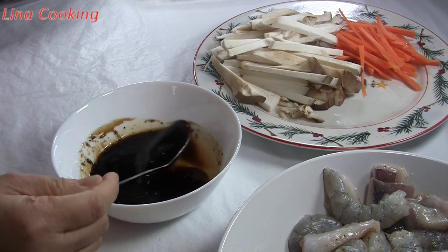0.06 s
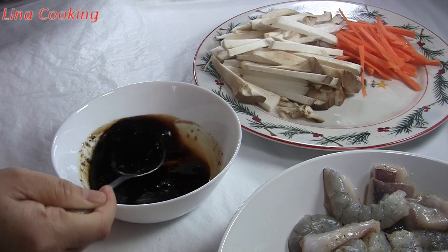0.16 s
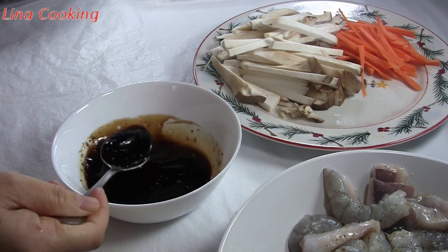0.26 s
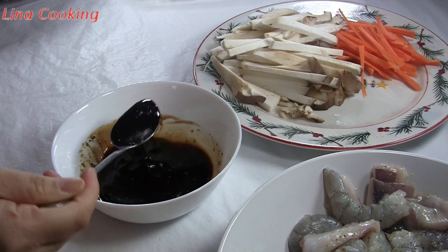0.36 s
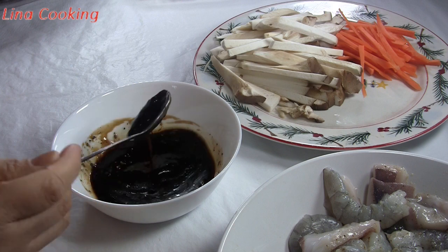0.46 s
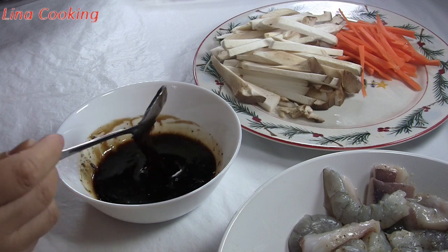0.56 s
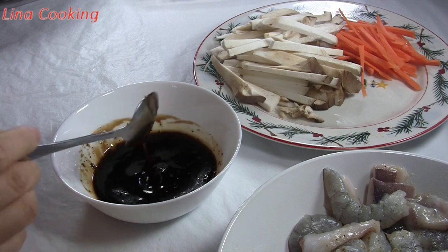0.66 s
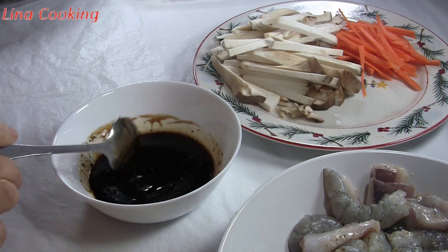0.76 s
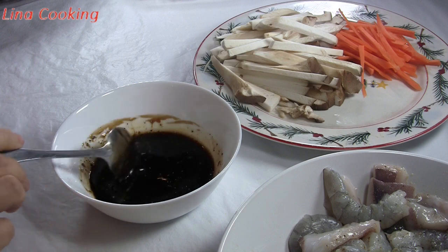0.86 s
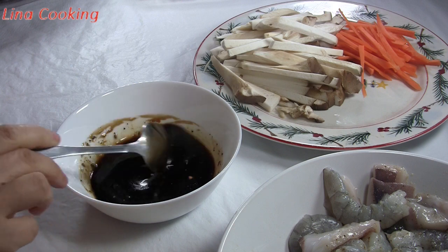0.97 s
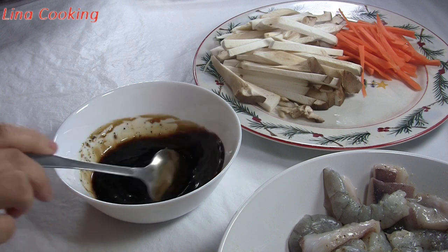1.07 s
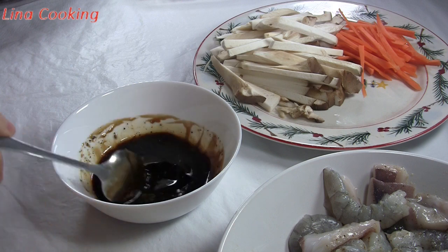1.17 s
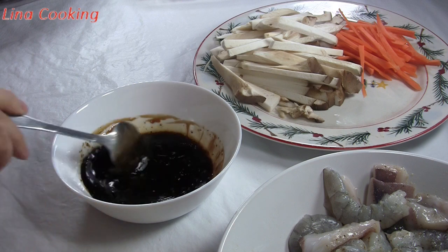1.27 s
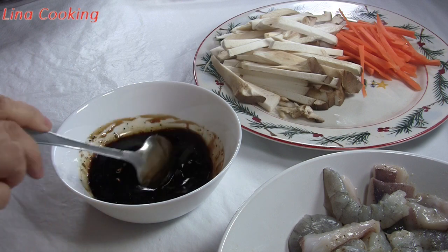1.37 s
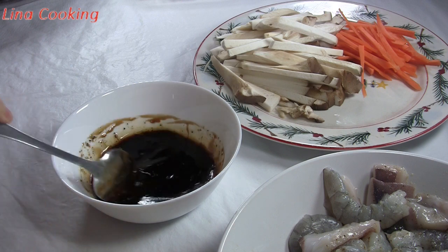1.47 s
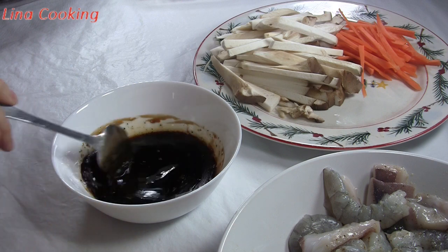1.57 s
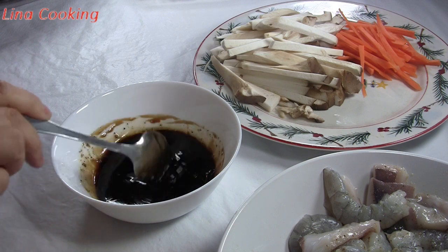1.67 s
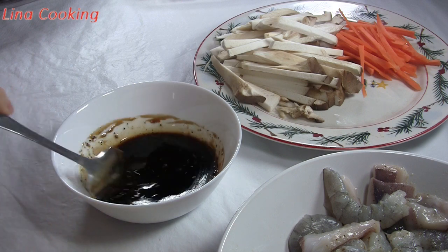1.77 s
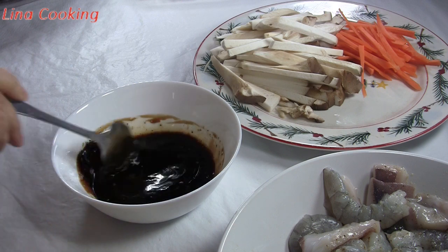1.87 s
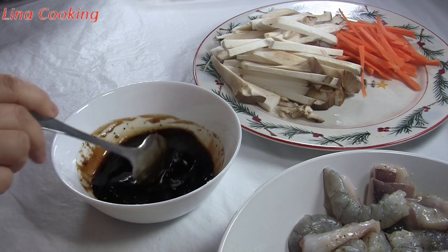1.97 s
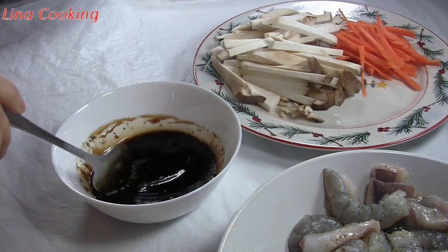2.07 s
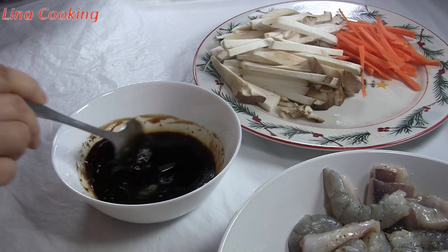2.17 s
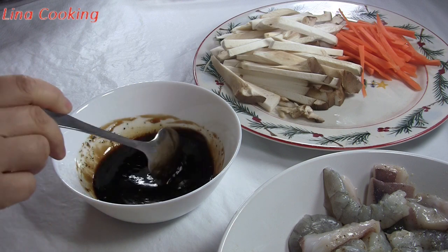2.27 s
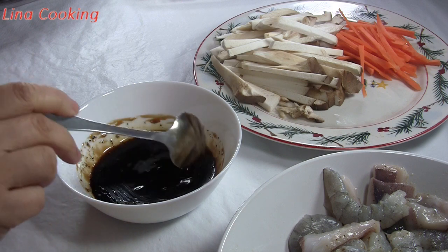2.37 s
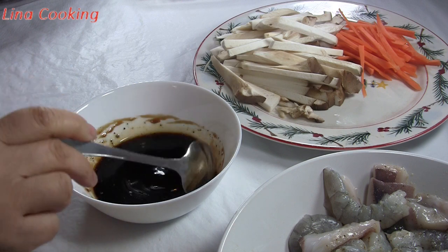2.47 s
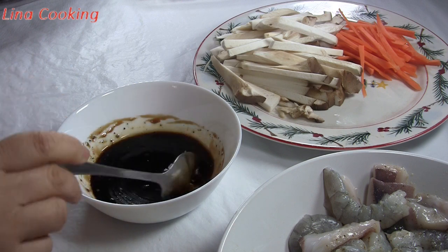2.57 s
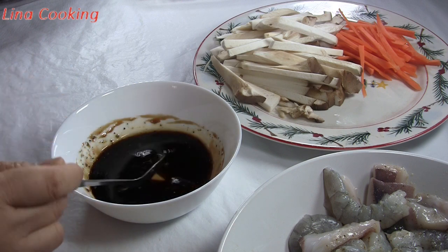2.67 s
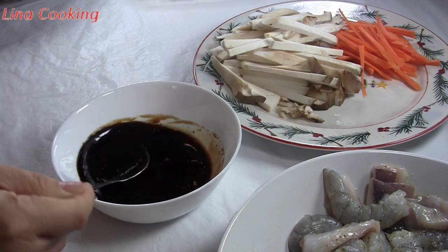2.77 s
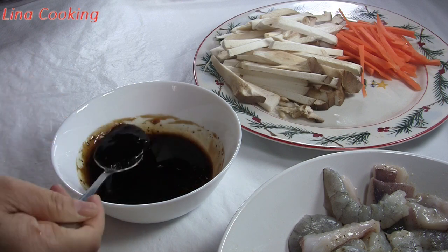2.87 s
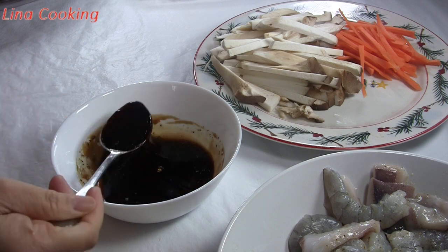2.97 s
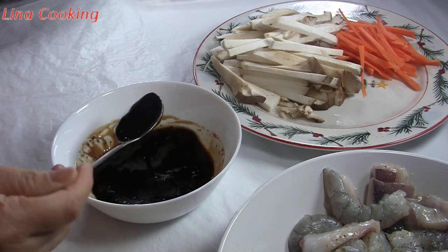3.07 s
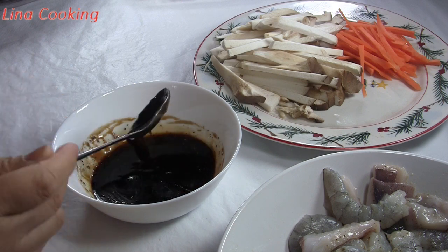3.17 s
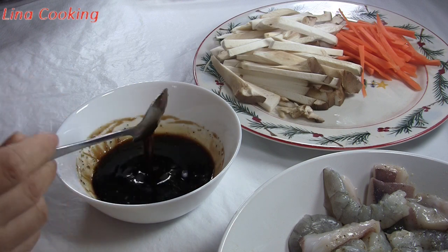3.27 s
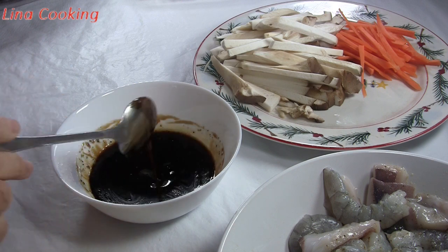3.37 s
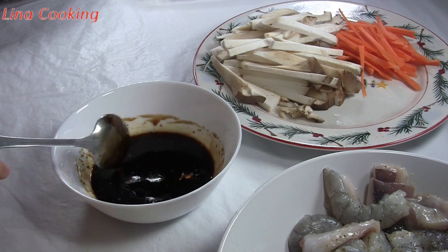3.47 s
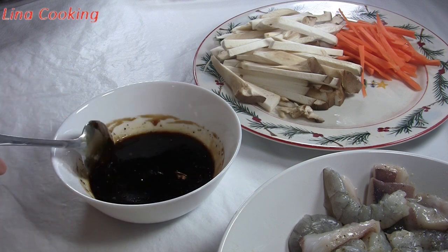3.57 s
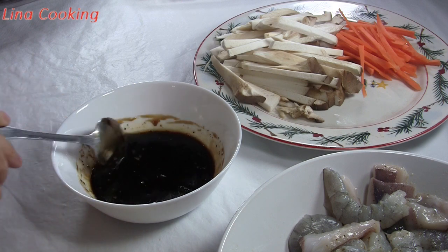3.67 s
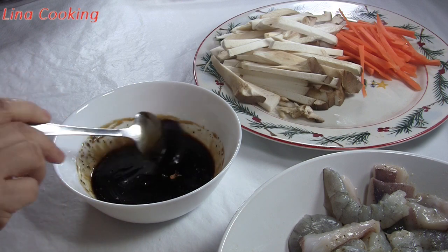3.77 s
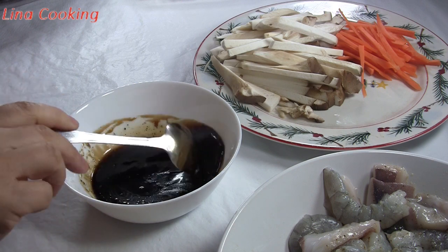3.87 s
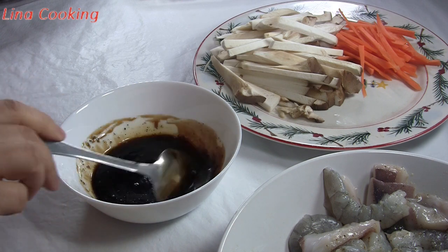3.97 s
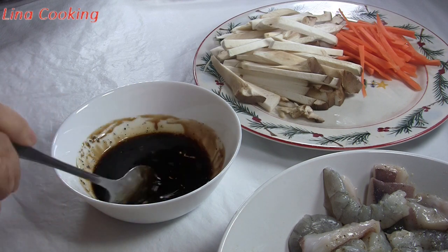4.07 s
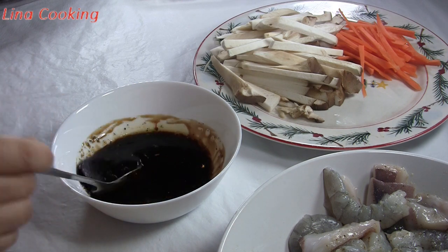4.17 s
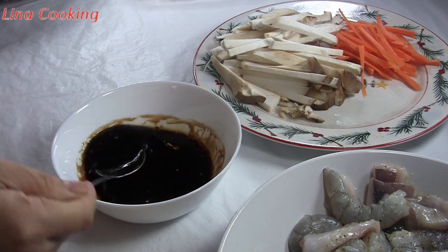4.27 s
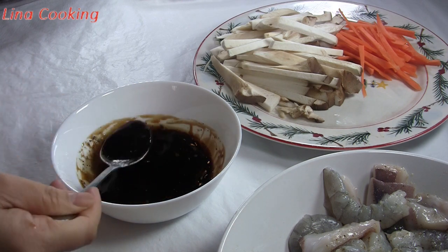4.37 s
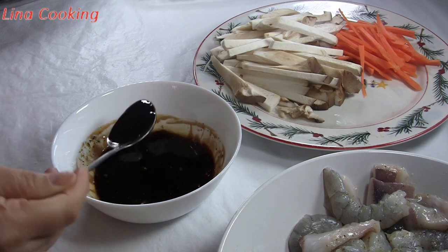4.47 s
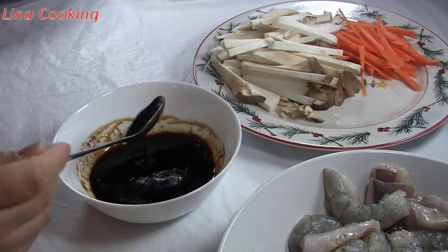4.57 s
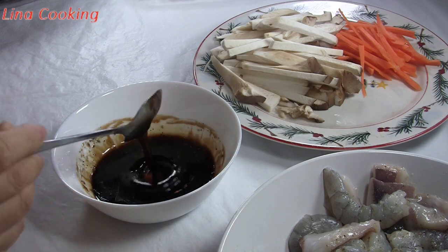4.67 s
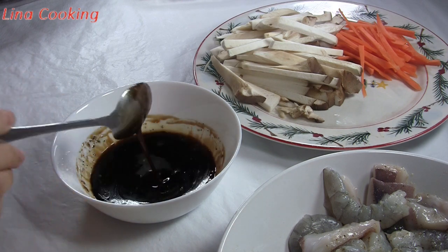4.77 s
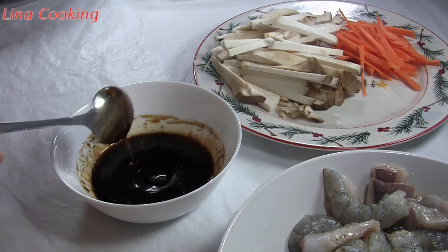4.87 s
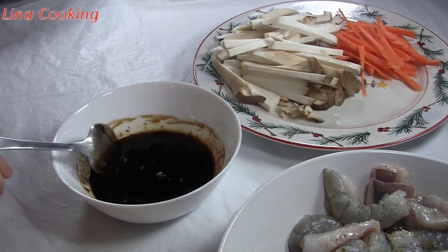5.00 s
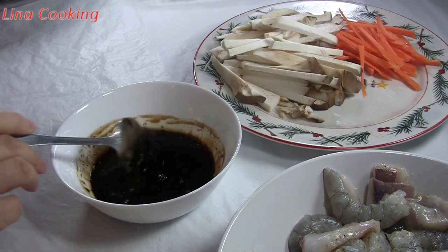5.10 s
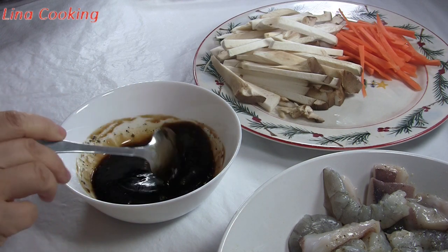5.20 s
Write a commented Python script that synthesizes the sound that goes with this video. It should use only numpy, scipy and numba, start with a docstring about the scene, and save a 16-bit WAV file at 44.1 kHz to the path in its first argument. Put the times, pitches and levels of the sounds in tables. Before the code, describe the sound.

Close, irregular stirring: sharp spoon clinks, short ceramic rings, damped ticks and soft glaze scraping, with faint drips over low kitchen noise.

```python
"""A metal spoon stirs thick sauce in a ceramic bowl on a cloth, close to a pair of microphones.
Throughout: kitchen air noise and a wavering hum, both from shaped noise. From the start, knocks crack
(noise bursts), ring the bowl (fixed modes) and set off the spoon (damped modes whose pitch slides).
Between knocks the spoon's edge chatters along the glaze: stick-slip impulses and grit hiss.
From 0.6 s a few drips chirp upward. Dishes and room echo spoon, bowl and drips."""
import sys
import numpy as np
from scipy import signal
from scipy.fft import rfft, irfft, next_fast_len
from scipy.io import wavfile
from numba import njit

SR = 44100
rng = np.random.default_rng(int(sys.argv[2]) if len(sys.argv) > 2 else 0)


def wrap_up_sound(samples):
    """Save the sound to the file named by the first command line argument, as 16-bit audio."""
    columns = np.atleast_2d(samples).T
    # keep every value between -1 and 1, then stretch to whole-number steps
    tamed = np.clip(columns, -1, 1)
    steps = np.round(tamed * 32767).astype(np.int16)
    wavfile.write(sys.argv[1], SR, steps)


N = 231012

# kitchen noise spectra, mid and side: (frequency [Hz], density [dB per Hz])
KITCHEN_MID_SPECTRUM = [(12, -59.5), (20, -72), (49, -4), (96, -6), (189, -3.5), (223, -6), (257, 2.5),
                        (287, -4), (476, -8.5), (517, -8.5), (833, -16), (1730, -22.5), (2560, -23.5),
                        (15000, -34), (16300, -56)]
KITCHEN_SIDE_SPECTRUM = [(12, -45), (20, -9), (295, -2.5), (547, -10), (907, -12.5), (1130, -16),
                         (1730, -16), (2290, -20), (2630, -20), (15000, -30.5), (16300, -34)]
KITCHEN_MID_DB, KITCHEN_SIDE_DB, KITCHEN_LEFT_MINUS_RIGHT_DB = -51., -54.5, -2
HUM_HZ, HUM_WIDTH_HZ, HUM_DB = 256, 14, -63.5

# hard knocks on the wall: (time [s], crack [dB], thud [dB], damped spoon [dB], edge-on [0-1],
# crack t60 [s], low bowl ring [dB], high bowl ring [dB])
KNOCKS = [(.0064, -17, -45, -22.5, 0.83, 0.025, -36, -45),
          (0.0291, -30.5, -31.5, -26, 0.98, 0.077, -82, -60),
          (0.1696, -24, -27.5, -34, 0.28, 0.029, -36, -41.5),
          (0.9305, -10, -19.5, -41, 0.09, 0.013, -42, -51), (1.9248, -26, -23, -59, 0.11, 0.02, -44.5, -66),
          (2.2232, -28.5, -29, -56, 0.09, 0.038, -40, -58),
          (2.2663, -31.5, -29.5, -27, .02, 0.032, -56, -64),
          (2.5787, -25, -59, -54, 0.09, 0.07, -36.5, -46), (2.9226, -27, -40.5, -30, 1, 0.065, -58, -56),
          (3.699, -22, -22.5, -16.5, 0.14, 0.037, -43.5, -45),
          (3.8938, -25, -17, -15, 0.08, 0.062, -44, -68), (4.1201, -19, -22.5, -35, 0.06, .11, -33, -23),
          (4.133, -21.5, -29, -16, 0, 0.016, -69, -32), (5.1296, -12, -15, -33, 0.07, 0.019, -42, -69)]
# light ticks, no bowl ring: (time [s], crack [dB], thud [dB], damped spoon [dB], place on rim [turns])
TICKS = [(.0214, -40, -29, -45, 0.26), (.0502, -31, -53, -26, 0.075), (.0915, -28.5, -50, -22.5, 0.23),
         (.1084, -32, -48, -40, .2), (.1844, -47, -62, -41, .33), (.6963, -40.5, -77, -52, 0.017),
         (.944, -41, -60, -9.5, 0.77), (1.032, -53, -65, -41, 0.76), (1.0929, -44, -24, -11, 0.027),
         (1.1948, -59, -54, -32, 0.15), (1.2704, -50, -61, -33, 0.28), (1.4098, -39, -72, -33, 0.37),
         (1.4696, -41, -66, -28.5, 0.35), (1.512, -37, -58, -22.5, 0.43), (1.5499, -38.5, -57, -34, 0.49),
         (1.694, -40, -40, -38, .1), (1.7382, -40, -55, -29, 0.88), (1.8083, -58, -52, -21, 0.39),
         (1.838, -39, -42, -29, 0.43), (1.9377, -51, -36, -32, 0.77), (2.0384, -40.5, -63, -35, 0.41),
         (2.0916, -43, -64, -27.5, 0.05), (2.1056, -55, -64, -19, 0.49), (2.1307, -53, -66, -28.5, .38),
         (2.2354, -52, -31, -40, 0.14), (2.6256, -37, -34, -49, 0.37), (2.7026, -40, -38, -31, 0.085),
         (2.741, -29, -65, -22, 0.39), (2.7754, -36, -63, -27, 0.43), (2.8156, -41, -41.5, -52, 0.26),
         (2.8627, -39, -40.5, -40, .55), (3.715, -51, -31, -23, 0.2), (4.1503, -48, -46, -22, 0.73),
         (4.1798, -31.5, -30, -28, 0.22), (4.2094, -34, -33.5, -32, 0.44), (5.1441, -51, -54, -37, 0.63)]
TICK_T60_S = 0.016
# contact noise spectra: (frequency [Hz], density [dB per Hz])
CRACK_SPECTRUM = [(180, -60), (300, -2), (1580, -6.5), (4590, 4), (5080, -0.5), (6850, 0), (11700, 0),
                  (15200, -6.5), (16000, -57)]
THUD_SPECTRUM = [(150, -48.5), (450, -8), (950, -6), (1600, 3), (2300, -5.5), (3600, -5.5), (8000, -54)]

# bowl mode pitches: (frequency [Hz])
BOWL_HZ = [774, 1233, 1752, 2955, 3009, 4538, 5040, 6336, 8441, 9593, 10760, 11390, 12470, 13300, 13420,
           14990]
# bowl modes, same order: (level [dB], t60 [s])
BOWL_MODES = [(-11, 0.81), (-15, 0.16), (-6.5, 1.01), (-5, 0.17), (-1, 0.54), (0, 0.4), (-11, 0.17),
              (-4.5, 0.26), (-13, .27), (-17, 0.16), (-6, 0.1), (-15, .2), (-32, .3), (-8, .14), (-20, .18),
              (-21, .15)]
# modes of the spoon free of the sauce: (frequency [Hz])
FREE_SPOON_HZ = [2893, 4930, 7790, 7990, 10430, 12140, 13495]
# same order: (level [dB], t60 [s])
FREE_SPOON_MODES = [(0, 0.33), (-9, 0.094), (-5, 0.27), (3.5, 0.05), (-17, 0.3), (-20, 0.11), (2, 0.097)]
# modes of the spoon struck on its edge: (frequency [Hz])
EDGE_HZ = [4021, 6358]
# same order: (level [dB], t60 [s])
EDGE_MODES = [(-7.5, 0.077), (-6.5, 0.065)]
FREE_RING_DB = -20.5  # re crack
# re crack: (flat knock [dB], edge-on knock [dB])
UPPER_DB, EDGE_RING_DB = (7, -48), (-59, 6)

# strokes along the glaze, rise and fall span 20 dB: (time [s], rise [s], hold [s], fall [s],
# body [dB], upper [dB], depth in sauce [0-1], middle resonance [Hz], upper resonance [Hz])
STROKES = [(0.007, 0.016, 0.21, 0.02, -38, -52.5, 0.6, 2910, 5030),
           (0.09, .015, 0.0034, 0.058, -34, -37, 1, 2940, 5200),
           (0.172, 0.027, 0.009, 0.05, -34.5, -44, 0.13, 2976, 4760),
           (0.969, 0.025, 0.13, 0.025, -42, -34, 0.26, 2842, 4934),
           (1.102, 0.04, .002, 0.11, -36.5, -37, 0.35, 3106, 4770),
           (1.161, .05, 0.091, .04, -44.5, -48.5, 0.73, 3020, 5030),
           (1.278, 0.024, 0.0023, 0.12, -33.5, -52, .4, 3020, 4800),
           (1.363, 0.13, 0.89, .05, -56, -59, 0.31, 3040, 5350),
           (1.47, 0.14, 0.064, 0.13, -43, -62, 1, 3080, 4900),
           (1.708, 0.021, .002, 0.2, -39, -58, 0.63, 3056, 5380),
           (1.79, 0.051, 0.06, 0.064, -42.5, -57.5, 0.86, 3270, 4970),
           (1.953, 0.021, 0.0017, 0.2, -52, -48, 0.1, 3000, 5230),
           (2.087, 0.045, 0.038, 0.098, -40.5, -52.5, 1, 3140, 4950),
           (2.286, .02, .005, 0.062, -39.5, -41.5, 0.38, 2933, 5090),
           (2.595, 0.026, 0.079, 0.08, -48.5, -52, 0.47, 2850, 4760),
           (2.735, 0.13, 0.041, 0.063, -38, -50, 1, 3045, 5470),
           (2.858, 0.04, 0.0022, 0.047, -43, -47, 0.05, 3005, 5130),
           (2.936, 0.04, .02, 0.1, -39.5, -60, 0.5, 3020, 5050),
           (3.724, 0.01, .002, 0.057, -28.5, -55, 0.74, 2884, 5000),
           (3.915, 0.015, .002, 0.071, -27, -40, 0.36, 2924, 5370),
           (3.983, .02, 0.094, 0.028, -60, -63, 0, 2950, 5230),
           (4.165, 0.017, 0.022, 0.044, -30.5, -34, 0, 2967, 4850),
           (4.243, .02, 0.028, 0.13, -47, -48.5, .4, 3080, 5010),
           (5.155, 0.011, 0.1, .03, -52, -35, 0.4, 2860, 4990)]
# lower, middle, side resonance re body: (bare glaze [dB], deep in sauce [dB])
BODY_MIX = [(-18, -3.5), (2, -19), (-42.5, -5.5)]
# lower resonance as the spoon dips and tilts: (time [s], frequency [Hz], gain [dB])
DIP = [(0, 1470, 0.5), (.12, 1140, -1.5), (1.102, 1400, -2), (1.125, 2600, -8), (1.16, 2420, -6),
       (1.24, 2004, 2), (1.31, 1590, -2.5), (1.37, 1650, -6), (1.4, 2410, -24), (1.471, 2020, 4.5),
       (1.53, 1770, -4), (1.7, 1950, -2), (1.82, 1777, -6.5), (2.13, 1695, -14), (2.3, 1640, 1),
       (2.75, 1170, -17), (2.86, 1210, 2), (2.95, 1630, -6), (3.701, 1845, -4), (4.098, 1840, -4.5),
       (4.131, 1360, -4.5), (4.3, 1190, -1), (5.13, 2010, -3)]
# lower, middle, side, upper resonance, damped by hand and sauce: (t60 [s])
SPOON_T60_S = [.026, .07, .018, .032]
# modes clustered at each of the four: (pitch ratio [1], level [dB])
CLUSTERS = [
    [(1, 0)],
    [(1, 0)],
    [(1, 0), (.96, -3), (1.05, -3)],
    [(1, 0), (.96, -3), (1.03, -5), (1.09, -13)],
]
SIDE_HZ, SIDE_WANDER_SHARE, SIDE_WANDER_STEP_S = 3570., .022, .04
TICK_LOWER_DB = -4  # lower resonance's share of a tick, re side
RIM_SPREAD_DB = 11  # loss a quarter turn from a resonance's best place
# sauce grit spectrum: (frequency [Hz], density [dB per Hz])
GRIT_SPECTRUM = [(290, -57), (500, -45), (1210, -14), (2500, -16), (3700, -27), (4150, -49), (4870, 14.5),
                 (5970, -2), (10700, -0.5), (16000, -6)]
GRIT_DB, GRIT_GROWTH_DB_PER_DB = -54.5, 0.68  # hiss under a -50 dB stroke; growth with stroke level

# drips of sauce falling back: (time [s], level [dB], starting pitch [Hz])
DRIPS = [(0.634, -45, 190), (2.93, -39.5, 246), (3.35, -33, 5050), (3.375, -41, 4700), (3.841, -44, 1060),
         (4.285, -41, 3360), (4.815, -47, 1380)]

# microphone ports: (frequency [Hz], left minus right [dB])
PORT_BALANCE = [(100, -15), (700, -3), (1400, -1), (2800, -6.5), (5600, -2), (12000, -2)]
# (frequency [Hz], phase by which left leads [rad])
PORT_PHASE = [(0, 0), (600, .2), (1900, .6), (2600, 1.2), (4500, 1.9), (8000, 1.5), (12000, 1.6),
              (16000, 2.4)]
SCATTER_T60_S, SCATTER_DB, SCATTER_TOP_HZ = 0.012, -5, 13000.
ROOM_T60_S, ROOM_DB, ROOM_TOP_HZ = 0.52, -15, 6340
TOP_HZ, CLIP_LEVEL = 16200, .96


def undb(db):
    """Decibels to gain."""
    return 10 ** (np.asarray(db) / 20)


def level(x, rms_db):
    """Scale to an rms level."""
    return x * undb(rms_db) / np.sqrt(np.mean(x ** 2))


def between(ends, share):
    """Blend two values by a share of 0 to 1."""
    return ends[0] + np.clip(share, 0, 1) * (ends[1] - ends[0])


def over_bins(table, size):
    """Read a (Hz, value) table at every transform bin, linear over log frequency."""
    hz, value = np.transpose(table)
    bin_hz = np.fft.rfftfreq(size, 1 / SR)
    return np.interp(np.log(bin_hz + 1), np.log(hz + 1), value)


def colour(x, spectrum):
    """Filter a sound by a spectrum in dB."""
    return irfft(rfft(x) * undb(over_bins(spectrum, len(x))), len(x))


def keep_of(t60_s):
    """Share of a swing left after one sample."""
    return 1000. ** (-1 / (max(t60_s, .002) * SR))


@njit
def ring(x, hz, keep):
    """One driven mode: a decaying rotating phasor whose pitch may slide per sample."""
    y, z = np.empty(len(x)), 0j
    for i in range(len(x)):
        z = z * keep * np.exp(2j * np.pi * hz[i] / SR) + x[i] + 1e-18
        y[i] = z.imag
    return y


def train(times_s, gains):
    """Impulses at the given times."""
    x = np.zeros(N)
    at = np.clip((times_s * SR).astype(int), 0, N - 1)
    np.add.at(x, at, gains)
    return x


def kitchen():
    """Air noise and microphone hiss, with a wavering appliance hum: noise through a narrow mode."""
    hum = ring(rng.standard_normal(N), np.full(N, HUM_HZ), np.exp(-np.pi * HUM_WIDTH_HZ / SR))
    air = level(colour(rng.standard_normal(N), KITCHEN_MID_SPECTRUM), KITCHEN_MID_DB)
    mid = air + level(hum, HUM_DB)
    side = level(colour(rng.standard_normal(N), KITCHEN_SIDE_SPECTRUM), KITCHEN_SIDE_DB)
    left_gain = undb(KITCHEN_LEFT_MINUS_RIGHT_DB / 2)
    return np.array([(mid + side) * left_gain, (mid - side) / left_gain])


def cracks(times_s, crack_db, thud_db, t60_s):
    """The first milliseconds of contact: a bright burst and a duller thud through bowl and table."""
    size = 4096
    t = np.arange(size) / SR
    out = np.zeros(N + size)
    for k, (bright, dull) in enumerate(rng.standard_normal((len(times_s), 2, size))):
        onset = np.clip(t / .0003, 0, 1)
        fade = 1000. ** (-t / np.clip(t60_s[k], .003, .2)) * onset
        # harder knocks start with a sharper spike
        fade = fade + np.clip(1.9 + crack_db[k] / 22, 0, 2) * np.exp(-t / .0006)
        burst = level(colour(bright, CRACK_SPECTRUM), crack_db[k])
        thud = level(colour(dull, THUD_SPECTRUM), thud_db[k])
        i = int(max(times_s[k], 0) * SR)
        out[i:i + size] += (burst + thud) * fade
    return out[:N]


def struck(times_s, mode_hz, modes, db_at):
    """Knocks ring fixed two-pole modes; db_at gives each knock's strength at a pitch."""
    out = 0
    for hz, (mode_db, t60_s) in zip(mode_hz, modes):
        keep, turn = keep_of(t60_s), 2 * np.pi * hz / SR
        hits = train(times_s, undb(db_at(hz) + mode_db))
        out = out + signal.lfilter([0, np.sin(turn)], [1, -2 * keep * np.cos(turn), keep ** 2], hits)
    return out


def bowl(times_s, low_db, high_db):
    """Where and how hard the wall is hit shares the blow between low and high modes."""
    def db_at(hz):
        share = np.log(hz / 1750) / np.log(4500 / 1750)
        return between((low_db, high_db), share)
    return struck(times_s, BOWL_HZ, BOWL_MODES, db_at)


def spoon_blows():
    """What knocks and ticks hand to the lower, middle, side and upper resonance."""
    s, crack_db, _, middle_db, edge, *_ = np.transpose(KNOCKS)
    tick_s, *_, tick_db, place = np.transpose(TICKS)
    ticks = []
    for k in range(3):  # best places lie a third of a turn apart
        rim_db = RIM_SPREAD_DB * (np.cos(2 * np.pi * (place - k / 3)) - 1)
        ticks.append(train(tick_s, undb(tick_db + rim_db)))
    middle, side, upper = ticks
    lower = undb(TICK_LOWER_DB) * side
    middle = middle + train(s, undb(middle_db))
    upper = upper + train(s, undb(crack_db + between(UPPER_DB, edge)))
    return [lower, middle, side, upper]


def strokes():
    """Strokes rise, hold and fall in dB; powers add, and power-weighted means set the pitches."""
    s, rise, hold, fall, body_db, upper_db, depth, middle_hz, upper_hz = np.transpose(STROKES)[:, :, None]
    t = np.arange(0, N / SR, .001)
    before, after = np.clip(s - t, 0, None), np.clip(t - s - hold, 0, None)
    swell_db = -20 * (before / rise + after / fall)
    peaks_db = [body_db + between(mix, depth) for mix in BODY_MIX] + [upper_db]
    power = [undb(np.maximum(swell_db + db, -120)) ** 2 for db in peaks_db]
    rub_db = [10 * np.log10(p.sum(axis=0)) for p in power]
    total_db = 10 * np.log10(sum(power).sum(axis=0))
    grit_db = GRIT_DB + GRIT_GROWTH_DB_PER_DB * (total_db + 50)
    pitches = [(p * hz).sum(axis=0) / p.sum(axis=0)
               for p, hz in ((power[1], middle_hz), (power[3], upper_hz))]
    return [np.interp(np.arange(N) / SR, t, c) for c in (*rub_db, grit_db, *pitches)]


def chatter(rate_hz, spread_db, clump_db):
    """Stick-slip ticks of uneven size in clumps of a few milliseconds, rms 1."""
    ticks = (rng.random(N) < rate_hz / SR) * undb(spread_db * rng.exponential(size=N))
    ticks = ticks * rng.standard_normal(N)
    size = 256
    clumps = np.interp(np.arange(N) / size, np.arange(N // size + 2), rng.standard_normal(N // size + 2))
    return level(ticks * undb(clump_db * clumps), 0)


def spoon():
    """Chatter and blows drive four damped resonances; grit in the sauce hisses over them."""
    *rub_db, grit_db, middle_hz, upper_hz = strokes()
    t = np.arange(N) / SR
    dip_s, dip_hz, dip_db = np.transpose(DIP)
    steps = np.arange(0, N / SR, SIDE_WANDER_STEP_S)
    wander = np.interp(t, steps, rng.standard_normal(len(steps)))
    side_hz = SIDE_HZ * (1 + SIDE_WANDER_SHARE * wander)
    hz = [np.interp(t, dip_s, dip_hz), middle_hz, side_hz, upper_hz]
    gains = [undb(np.interp(t, dip_s, dip_db)), 1, 1, 1]
    rub = chatter(4000., spread_db=2.5, clump_db=4.0)
    grit = chatter(12000., spread_db=1.0, clump_db=2.5)
    out = undb(grit_db) * level(colour(grit, GRIT_SPECTRUM), 0)
    soft = keep_of(.006)
    for f, gain, t60_s, db, blow, cluster in zip(hz, gains, SPOON_T60_S, rub_db, spoon_blows(), CLUSTERS):
        keep = keep_of(t60_s)
        steady = np.sqrt(2 * (1 - keep ** 2) / len(cluster))  # steady rubbing rings near rms 1
        for ratio, mode_db in cluster:
            # a blow through sauce builds up over a millisecond
            push = 2 * (1 - soft) * ring(blow, ratio * f, soft)
            drive = steady * undb(db) * rub + push
            out = out + gain * undb(mode_db) * ring(drive, ratio * f, keep)
    return out


def drips():
    """Small bubbles: decaying sines that glide upward as they close."""
    out, t = np.zeros(N), np.arange(2000) / SR
    for s, db, hz in DRIPS:
        i = int(s * SR)
        fade = np.exp(-t / (0.0013 + 6.9 / hz))
        out[i:i + len(t)] += undb(db) * fade * np.sin(2 * np.pi * hz * t * (1 + 2.7 * t))
    return out


def ports(x):
    """Two microphone ports, each with its own level and lag over frequency."""
    size = next_fast_len(N + 2048)
    half = undb(over_bins(PORT_BALANCE, size) / 2) * np.exp(.5j * over_bins(PORT_PHASE, size))
    return np.array([irfft(rfft(x, size) * g, size)[:N] for g in (half, 1 / half)])


def echoes(x, t60_s, db, rise_s, top_hz):
    """A diffuse fading noise tail, different at each port."""
    t = np.arange(SR // 2) / SR
    tail = rng.standard_normal((2, len(t))) * 1000. ** (-t / t60_s) * np.clip(t / rise_s, 0, 1)
    tail = signal.sosfilt(signal.butter(1, top_hz, fs=SR, output="sos"), tail)
    tail = tail / np.sqrt(np.sum(tail ** 2, axis=1, keepdims=True))
    return undb(db) * signal.fftconvolve(x[None], tail, axes=1)[:, :N]


def room(rough, ringing):
    """Nearby dishes scatter the sharp sounds at once; tiles and cupboards answer later."""
    dishes = echoes(rough, SCATTER_T60_S, SCATTER_DB, .0005, SCATTER_TOP_HZ)
    walls = echoes(rough + undb(-6) * ringing, ROOM_T60_S, ROOM_DB, .01, ROOM_TOP_HZ)
    return dishes + walls


def scene():
    """Spoon and bowl up close, their echo, and the kitchen."""
    s, crack_db, thud_db, _, edge, t60_s, low_db, high_db = np.transpose(KNOCKS)
    tick_s, tick_db, tick_thud_db, *_ = np.transpose(TICKS)
    contact = cracks(s, crack_db, thud_db, t60_s)
    contact = contact + cracks(tick_s, tick_db, tick_thud_db, np.full(len(TICKS), TICK_T60_S))
    # small things radiate no bass
    highpass = signal.butter(2, 150, "high", fs=SR, output="sos")
    rough = signal.sosfilt(highpass, contact + spoon() + drips())
    ringing = bowl(s, low_db, high_db)
    ringing = ringing + struck(s, FREE_SPOON_HZ, FREE_SPOON_MODES, lambda hz: crack_db + FREE_RING_DB)
    edge_db = crack_db + between(EDGE_RING_DB, edge)
    ringing = ringing + struck(s, EDGE_HZ, EDGE_MODES, lambda hz: edge_db)
    return ports(rough + ringing) + room(rough, ringing) + kitchen()


def record(dry):
    """Input overload clips the peaks; a steep lowpass cuts the top."""
    lowpass = signal.ellip(10, .2, 90, TOP_HZ, fs=SR, output="sos")
    return signal.sosfilt(lowpass, np.clip(dry, -CLIP_LEVEL, CLIP_LEVEL))


dry = scene()
out = record(dry)
wrap_up_sound(out)
```